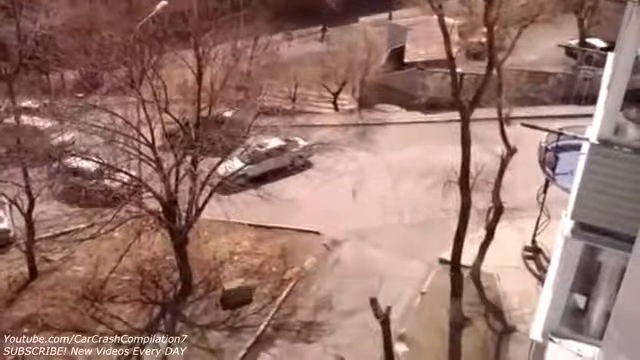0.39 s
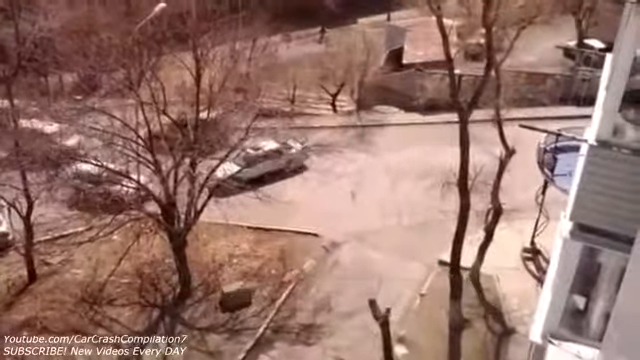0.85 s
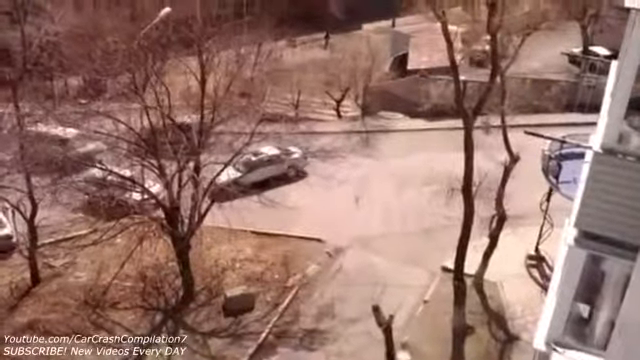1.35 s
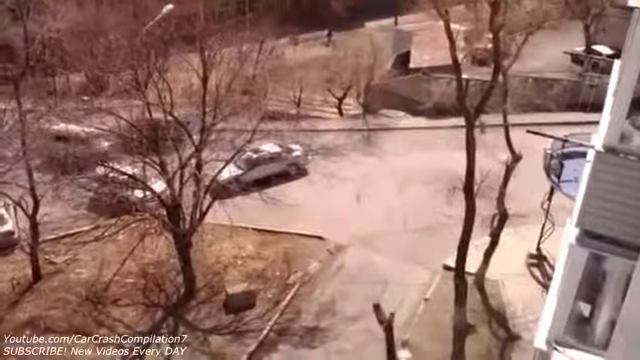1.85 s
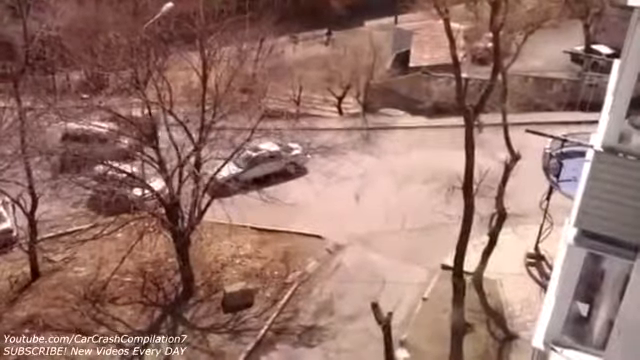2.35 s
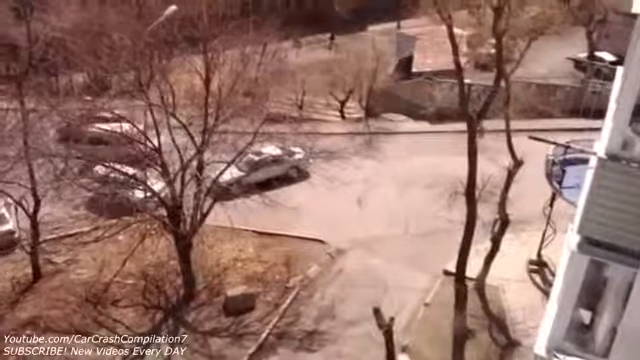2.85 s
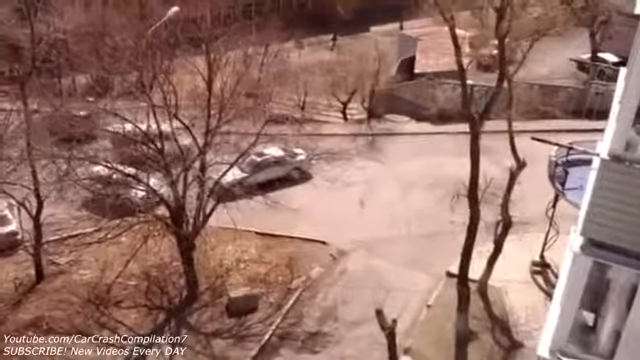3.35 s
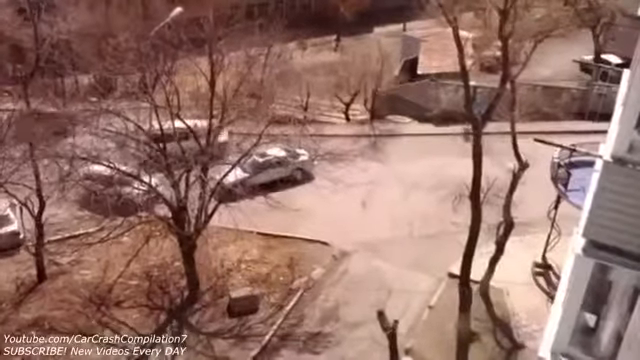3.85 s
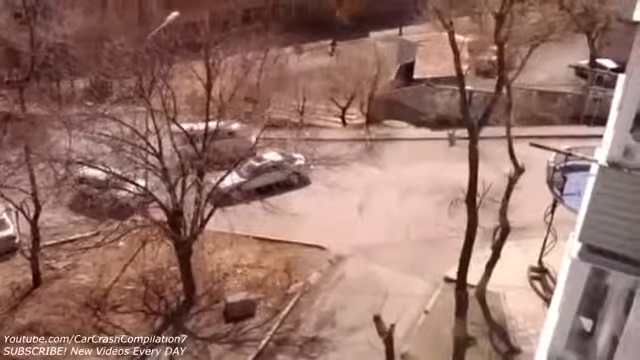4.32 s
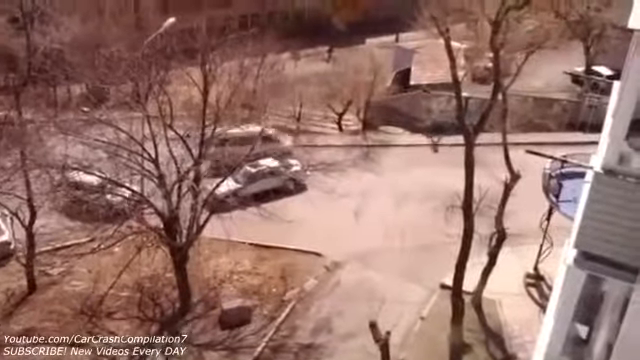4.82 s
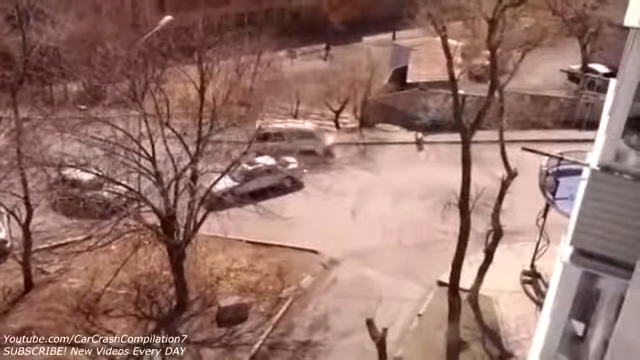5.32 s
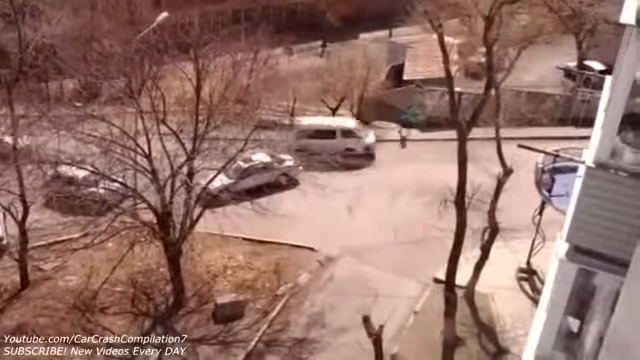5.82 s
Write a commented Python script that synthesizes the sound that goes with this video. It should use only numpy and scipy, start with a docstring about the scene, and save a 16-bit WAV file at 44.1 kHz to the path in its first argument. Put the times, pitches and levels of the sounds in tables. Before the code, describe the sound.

An open residential street heard from a balcony, with a soft, steady town rumble. From 0 s a van's four-cylinder engine hums low and boomy, rising a touch, with faint tyre hiss. At 0.65 s a small hollow double knock echoes off the houses. The engine sags to its lowest around 1.2 s, while three faint, short low notes sound far off until 1.6 s. From about 1.9 s road noise swells from a farther car, and the engine climbs smoothly, fluttering in strength, through 5 s. Gritty hiss surges around 3.5 to 4.3 s with tiny stone ticks; a faint, quick high chatter runs from 4.7 to 5.35 s. Around 5.5 s the engine weakens as nearby tyre roar grows, and heavy wind thumps buffet the microphone at 5.6 to 5.75 s. The engine pitch falls after 6 s; thin, very high brake squeals chirp just before the abrupt end at 6.2 s.

```python
"""Van pulling away below a balcony

A four-cylinder van drives along a street, its note, a sum of shaft orders, sagging near 1.2 s,
then climbing until near the end.
Tyre roar is shaped noise with narrow resonances; gritty hiss, swelling bands and chatter lie above it.
A knock early on is a sum of decaying modes; far low notes and flicked stones are brief decays.
Near the end wind thumps the microphone as decaying sines, and a brake squeals in short bursts.
A steady town background is stationary shaped noise."""
import sys
import numpy as np
from scipy import signal
from scipy.io import wavfile
from scipy.ndimage import uniform_filter1d

SR = 44100
rng = np.random.default_rng(int(sys.argv[2]) if len(sys.argv) > 2 else 0)


def voltage_ratio(level):
    """Linear amplitude factor for a level in decibels (scalar or array-like)."""
    return 10 ** (np.asarray(level, float) / 20)


def transcribe(u):
    """Save the signal u as a 16-bit wav file named by the first command-line argument.

    u: samples, shape (n,) or (channels, n), limited to [-1, 1]; the rate is SR.
    q: integer samples, one column per channel.
    """
    v = np.clip(np.atleast_2d(u).T, -1, 1)
    q = np.round(v * 32767).astype(np.int16)
    wavfile.write(sys.argv[1], SR, q)


N = 272979

# Spectra give relative density; the noise made from them is scaled to rms 1.
# Engine speed before the flywheel's smoothing: t/s, shaft f/Hz
SPEED = [(0.0, 19), (0.3, 19.4), (0.71, 21.5), (0.91, 19.8), (1.21, 17.3), (1.45, 18.8), (1.6, 19),
         (2.28, 22.3), (3.14, 26.8), (3.5, 29.7), (4.1, 34.5), (4.55, 37.5), (5.0, 40.2), (5.57, 42.3),
         (5.71, 44.6), (5.98, 42.8), (6.19, 34.7)]
# Engine load and nearness: t/s, level/dB, tilt of the overtones/(dB per octave)
LOAD = [(0, 5, 0.7), (.6, -1.5, -1), (1.1, 1, -0.9), (1.6, 0, 1.5), (2.1, -0.5, -.1), (2.5, 4, -4),
        (2.9, 3.5, -2.5), (3.3, -2.5, -0.5), (3.7, -1.5, -.1), (4.1, 0.5, -1), (4.5, 0, 0.6),
        (4.9, 0.5, -1.5), (5.43, -2, -1.5), (5.55, -12, 7), (5.78, -5, -0.5), (6.03, -13.5, 1),
        (6.13, 1, -5), (6.19, -3, -8)]
# Orders heard: multiples of the shaft frequency
ORDERS = [2, 3, 4, 5, 6, 8, 10]
# Strength of each order at the engine: level/dB
ORDER_LEVELS = [0, -21.5, -10.5, -24.5, -18.5, -24.5, -29.5]
# Waver of each order, larger for weak orders: rms/dB
ORDER_WAVERS = [0.89, 3.5, 1.2, 3.94, 2.24, 3.3, 3.3]
# Passage of the boom through exhaust pipe and street: f/Hz, level/dB
EXHAUST = [(35, -58), (50, -52.5), (58, -37), (65, -30.5), (72, -35.5), (80, -28), (100, -30), (115, -35.5),
           (140, -31), (165, -32.5), (215, -31.5), (235, -33.5), (250, -39.5), (350, -45.5)]
# Brief dips in the engine's orders: t/s, f/Hz, depth/dB, 1/e half-length/s
DIPS = [(0.295, 78, 4, 0.069), (0.906, 79, 9, 0.037), (1.233, 70, 5, 0.036), (1.838, 81, 10, 0.094),
        (2.145, 86, 7, 0.073), (2.42, 92, 11, 0.057), (2.677, 97, 5, 0.056), (3.32, 113, 14, 0.047),
        (3.621, 61, 13, 0.076), (3.876, 131, 12, 0.085), (4.14, 69, 12, 0.042), (4.289, 143, 12, 0.054),
        (4.897, 158, 4, .04), (5.187, 82, 4.5, 0.049), (5.306, 165, 18, 0.13), (.78, 125, 0, 0.085),
        (2.63, 144, 14, .07), (5.03, 242, 16, 0.11), (3.773, 191, 1, 0.054), (5.1, 203, 8, .1),
        (2.85, 202, 8, 0.22), (3.09, 106, 5, 0.031), (4.784, 77, 2.5, 0.076), (5.61, 86, 4.5, .04),
        (6.14, 147, 9, .07), (.1, 153, 8, .08), (3.47, 176, 2.5, 0.086), (5.72, 89, 6, .035),
        (.07, 76, 6, .04), (5.91, 87, 5, .04), (2.3, 224, 8, .2), (1.1, 180, 6, .12), (.05, 114, 5, .06)]
# Traffic on the street: t/s, farther car's roar level/dB, van's roar level/dB
TRAFFIC = [(0, -61, -65), (.6, -63.5, -76), (1.2, -64.5, -74), (1.65, -63, -75), (1.9, -57, -67.5),
           (2.4, -55.5, -60.5), (2.9, -58, -62.5), (3.4, -59, -71), (3.8, -62.5, -60.5), (4.12, -58.5, -59),
           (4.35, -60, -62), (4.9, -59.5, -59), (5.3, -57, -55), (5.6, -60, -52), (5.9, -60, -50.5),
           (6.05, -64, -49), (6.19, -55, -50.5)]
# Van's roar spectrum: f/Hz, level/(dB per Hz)
VAN_ROAR = [(180, -42), (300, -6), (459, -8.5), (740, -5), (1010, -10.5), (1210, -4.5), (1590, -7.5),
            (1870, -4.5), (6000, -29), (7800, -41), (13200, -120)]
# Van's tyre resonances: f/Hz, width of each smoothing/Hz, level/dB
VAN_TREAD = [(1806, 50, -18), (2270, 47, -1), (2506, 51, 0.5)]
# Farther car's roar spectrum: f/Hz, level/(dB per Hz)
FAR_ROAR = [(180, -26), (300, -5), (620, 1.5), (877, -4), (1110, 3), (1440, -4.5), (1810, -7), (4000, -18),
            (5200, -33), (8800, -120)]
# Farther car's tyre resonances: f/Hz, width of each smoothing/Hz, level/dB
FAR_TREAD = [(600, 130, -12.5), (1062, 59, -10), (1204, 53, -10), (1817, 93, 0), (2736, 73, 2)]
# Spectrum of the gritty treble: f/Hz, level/(dB per Hz)
GRIT = [(1470, -20), (2500, -4), (2990, -4.5), (3550, -1.5), (5510, -7), (13900, -14.5), (14900, -16)]
# Gritty treble before its crackle: t/s, level/dB
GRIT_LEVEL = [(0.0, -67.5), (0.45, -71), (0.62, -73), (1.64, -77.5), (1.9, -67), (2.57, -65.5),
              (3.1, -71.5), (3.45, -70), (3.57, -63), (3.79, -63), (4.0, -66), (4.09, -62), (4.29, -66),
              (5.0, -66.5), (5.32, -59.5), (5.4, -61), (6.19, -59)]
# Bands of hiss; a peak set after the end is cut short:
# start t/s, peak t/s, end t/s, f/Hz, width of each smoothing/Hz, level/dB
SWELLS = [(3.499, 3.579, 3.68, 4800, 1800, -70), (3.66, 3.79, 3.96, 5100, 1200, -69),
          (3.944, 4.096, 4.2, 5900, 2500, -72), (4.6, 4.79, 4.9, 650, 110, -59),
          (4.95, 5.5, 5.4, 1830, 80, -62), (5.396, 5.75, 6.4, 770, 70, -61.5),
          (5.95, 6.08, 8.1, 2200, 600, -54.5), (5.3, 5.6, 6.3, 175, 90, -48.5),
          (1.7, 2.07, 3.6, 1150, 240, -61.5), (4.1, 4.6, 5.16, 2780, 900, -69),
          (1.83, 2.1, 3.3, 1800, 170, -63.5), (5.4, 5.8, 6.5, 3700, 700, -63)]
# Span of the chatter: start t/s, end t/s
CHATTER_SPAN = (4.74, 5.35)
# Bursts of brake squeal before their unsteadiness: start t/s, length/s, f/Hz, rms level/dB
SQUEAL = [(6.134, .012, 12520, -59), (6.144, 0.0093, 12950, -63), (6.155, .021, 13280, -53),
          (6.174, 0.024, 13250, -56)]
# Knocks: t/s, strike level/dB, share of the low modes
KNOCKS = [(.641, -40.5, 0.79), (0.6511, -43, 0.18)]
# Modes of the hollow body, relative to the strike: f/Hz, level/dB, t60/s
KNOCK_MODES = [(700, -6.5, 0.066), (856, -3.5, 0.044), (990, -5, 0.033), (1160, -6, 0.043),
               (1297, 3, 0.038), (2740, -12, 0.025)]
# Short low notes far off: t/s, level before the attack ramp/dB, f/Hz, t60/s
FAR_NOTES = [(1.204, -45, 388, 0.11), (1.359, -44, 258.5, 0.23), (1.581, -49, 277, 0.23)]
# Single stones before their decay: t/s, level/dB, f/Hz
TICKS = [(2.811, -65, 6000), (3.285, -64, 11500), (3.79, -58, 6000), (3.981, -59, 12000),
         (4.113, -68, 13500), (4.13, -64, 11600), (4.366, -67, 4040), (5.32, -57, 9900), (5.335, -57, 6270)]
# Wind on the microphone, before a 3 dB cut: t/s, level/dB
WIND = [(0, -55.5), (2.2, -56.5), (3.2, -55), (4.7, -54.5), (5.3, -49.5), (5.76, -43.5), (6.05, -40.5),
        (6.19, -38)]
# Gust blows: t/s, initial level/dB, swing f/Hz, t60/s
THUMPS = [(5.577, -26.5, 45, 0.15), (5.632, -23, 45, 0.076), (5.655, -26, 61, 0.12),
          (5.68, -20, 92.2, 0.13), (5.681, -32.5, 405, 0.024), (5.697, -34, 258, 0.066),
          (5.722, -22.5, 31, 0.24)]
# Spectrum of the town: f/Hz, level/(dB per Hz)
TOWN = [(12, -40), (22, -29), (40, -5), (65, 0.5), (100, -8.5), (160, -6.5), (230, -14), (310, -19),
        (600, -23.5), (1100, -28), (1800, -39), (3200, -40), (6500, -49), (15000, -58)]


def evened(x):
    """Normalisation: the signal is divided by its rms value."""
    return x / np.sqrt(np.mean(x ** 2) + 1e-20)


def curves(rows):
    """Linear interpolation: each column after the first becomes a function of time."""
    s, *columns = np.transpose(rows)
    return [np.interp(np.arange(N) / SR, s, column) for column in columns]


def add(mix, s, sound):
    """Superposition: a sound is added to the mix from s seconds on."""
    part = mix[round(s * SR):][:len(sound)]
    part += sound[:len(part)]


def drift(seconds):
    """Low-passed randomness: white noise averaged twice over the given time, at rms 1."""
    size = max(int(seconds * SR), 1)
    once = uniform_filter1d(rng.standard_normal(N), size)
    return evened(uniform_filter1d(once, size))


def resonate(x, hz, width_hz):
    """Resonance by heterodyning: hz is shifted to zero, smoothed twice and shifted back."""
    turn = np.exp(2j * np.pi * np.cumsum(hz * np.ones(len(x))) / SR)
    r = np.exp(-np.pi * width_hz / SR)
    smooth = signal.lfilter([(1 - r) ** 2], [1, -2 * r, r * r], x / turn)
    return 2 * (turn * smooth).real


def noise(spectrum, patchy_db, size=2048):
    """Spectral shaping: random short-time spectra with drifting patches, at rms 1."""
    frames, hz = 4 * N // size + 5, np.fft.rfftfreq(size, 1 / SR)
    a, b, patches = rng.standard_normal((frames, len(hz), 3)).T
    patches = uniform_filter1d(patches, size // 100, 0)  # along frequency
    patches = evened(uniform_filter1d(patches, 16384 // size, 1))  # along time
    f, db = np.transpose(spectrum)
    shape_db = np.interp(np.log(hz + 1), np.log(f + 1), db)[:, None]
    z = (a + 1j * b) * voltage_ratio(shape_db + patchy_db * patches)
    return evened(signal.istft(z, nperseg=size, noverlap=size * 3 // 4)[1][:N])


def shaft():
    """Rotational inertia: the flywheel evens the shaft speed (Hz) over a tenth of a second."""
    return uniform_filter1d(curves(SPEED)[0], SR // 10, mode="nearest")


def engine():
    """Harmonic orders through a pipe: each sine wavers at random in height and slightly in phase."""
    t, shaft_hz = np.arange(N) / SR, shaft()
    pipe_hz, pipe_db = np.transpose(EXHAUST)
    load_db, tilt_db = curves(LOAD)
    angle = 2 * np.pi * np.cumsum(shaft_hz) / SR
    out = np.zeros(N)
    for k, order_db, waver_db in zip(ORDERS, ORDER_LEVELS, ORDER_WAVERS):
        passed_db = np.interp(np.log(k * shaft_hz), np.log(pipe_hz), pipe_db)
        db = order_db + passed_db + tilt_db * np.log2(k / 2)
        for s, hz, depth_db, length in DIPS:
            octaves_off = abs(np.log2(k * shaft_hz[round(s * SR)] / hz))
            if octaves_off < 0.2:
                db = db - depth_db * np.exp(-((t - s) / length) ** 2)
        height = voltage_ratio(db + load_db + waver_db * drift(0.068))
        phase = 2 * np.pi * rng.random() + 0.05 * drift(0.014)  # radians
        out += np.sqrt(2) * height * np.cos(k * angle + phase)
    return out


def tyres(spectrum, bands):
    """Resonant reinforcement: broadband tyre roar rings in a few narrow bands."""
    roar = noise(spectrum, patchy_db=1.32)
    ringing = sum(voltage_ratio(db) * resonate(roar, hz, width) for hz, width, db in bands)
    return evened(roar + ringing)


def traffic():
    """Superposed rolling noise: the van and a farther car follow separate level curves."""
    far_db, van_db = curves(TRAFFIC)
    return voltage_ratio(far_db) * tyres(FAR_ROAR, FAR_TREAD) + voltage_ratio(van_db) * tyres(VAN_ROAR, VAN_TREAD)


def grit():
    """Amplitude modulation: stones flick across the whole treble at once, so the hiss crackles."""
    crackle_db = 1.17 * drift(0.0049)
    return noise(GRIT, patchy_db=2.0, size=512) * voltage_ratio(crackle_db + curves(GRIT_LEVEL)[0])


def swells():
    """Band-limited noise: each single resonance rises in power, then fades or is cut off."""
    t, out = np.arange(N) / SR, np.zeros(N)
    for start, peak, end, hz, width, db in SWELLS:
        power = np.interp(t, [start, peak, end], [0, 1, 0])
        hiss = evened(resonate(rng.standard_normal(N), hz, width))
        out += voltage_ratio(db) * np.sqrt(power) * hiss
    return out


def chatter():
    """Periodic modulation: quick puffs of high hiss, sharp in front, one per turn of the shaft."""
    t, (start, end) = np.arange(N) / SR, CHATTER_SPAN
    turns = (np.cumsum(shaft()) / SR + 0.04 * drift(0.03)) % 1
    puffs = turns * np.exp(-turns / 0.16)
    on = np.clip(np.minimum(t - start, end - t) / 0.05, 0, 1)
    spectrum = [(5000, -38), (7000, -7), (11000, -9), (13500, -4), (15000, -6.5)]  # f/Hz, level/dB
    hiss = noise(spectrum, patchy_db=2.0, size=256)
    # the puffs have rms 1 over the whole scene, before the ramps act again
    return voltage_ratio(-80.5 + 1.5 * drift(0.05)) * on * evened(puffs * on) * hiss


def squeal():
    """Stick-slip oscillation: a brake pad catches and sings in slightly unsteady sine bursts."""
    out = np.zeros(N)
    for s, length, hz, db in SQUEAL:
        t = np.arange(round(length * SR)) / SR
        ramps = np.clip(np.minimum(t, length - t) / 0.004, 0, 1)
        height = ramps * voltage_ratio(db + 2.5 * drift(0.003)[:len(t)])
        pitch_hz = hz + 50 * drift(0.003)[:len(t)]
        add(out, s, np.sqrt(2) * height * np.sin(2 * np.pi * np.cumsum(pitch_hz) / SR))
    return out


def knocks():
    """Modal decay: a double knock excites a hollow body, and the houses scatter it back."""
    out, t = np.zeros(N), np.arange(SR // 5) / SR
    for s, db, low in KNOCKS:
        for hz, mode_db, t60 in KNOCK_MODES:
            share = low if hz < 1100 else 1 - low
            add(out, s, share * voltage_ratio(db + mode_db - 60 * t / t60) * np.sin(2 * np.pi * hz * t))
        walls = evened(resonate(rng.standard_normal(len(t)), 780, 1060))
        add(out, s + 0.00201, voltage_ratio(db - 15.5 - 60 * t / 0.47) * walls)
    return out


def far_notes():
    """Damped oscillation: short low notes far off, each with a 9.2 ms attack."""
    out, t = np.zeros(N), np.arange(SR // 5) / SR
    for s, db, hz, t60 in FAR_NOTES:
        attack = np.minimum(t / 0.0092, 1)
        add(out, s, voltage_ratio(db - 60 * t / t60) * attack * np.sin(2 * np.pi * hz * t))
    return out


def ticks():
    """Impulsive noise: stones flicked by tyres give resonant bursts that die in milliseconds."""
    out, t = np.zeros(N), np.arange(SR // 5) / SR
    for s, db, hz in TICKS:
        burst = resonate(rng.standard_normal(len(t)), hz, 0.33 * hz)
        add(out, s, voltage_ratio(db - 60 * t / 0.024) * evened(burst))
    return out


def wind():
    """Pressure fluctuation: lumpy low noise on the capsule, with hard blows as damped sines."""
    spectrum = [(10, -27), (22, 9.0), (36, -6), (60, -7), (200, -41.0)]  # f/Hz, level/dB
    out = voltage_ratio(curves(WIND)[0] - 3.0) * noise(spectrum, patchy_db=0.0, size=4096)
    t = np.arange(SR // 4) / SR
    for s, db, hz, t60 in THUMPS:
        add(out, s, voltage_ratio(db - 60 * t / t60) * np.sin(2 * np.pi * hz * t))
    return out


def town():
    """Stationary noise: a steady town background of fixed mean spectrum."""
    return voltage_ratio(-49) * noise(TOWN, patchy_db=1.5, size=4096)


def scene():
    """Linear superposition: the pressures of all sources add at one microphone."""
    vehicles = engine() + traffic() + grit() + swells() + chatter() + squeal()
    brief = knocks() + far_notes() + ticks()
    return (vehicles + brief + wind() + town())[None]


def top_cut(x):
    """Nothing passes above the cut-off."""
    return signal.sosfilt(signal.butter(12, 15010, fs=SR, output="sos"), x)


def record(dry):
    """High-pass response: the microphone drops the lowest bass, below 16 Hz."""
    cut = signal.sosfilt(signal.butter(2, 16, "high", fs=SR, output="sos"), dry)
    return top_cut(cut)


dry = scene()
out = record(dry)
transcribe(out)
```